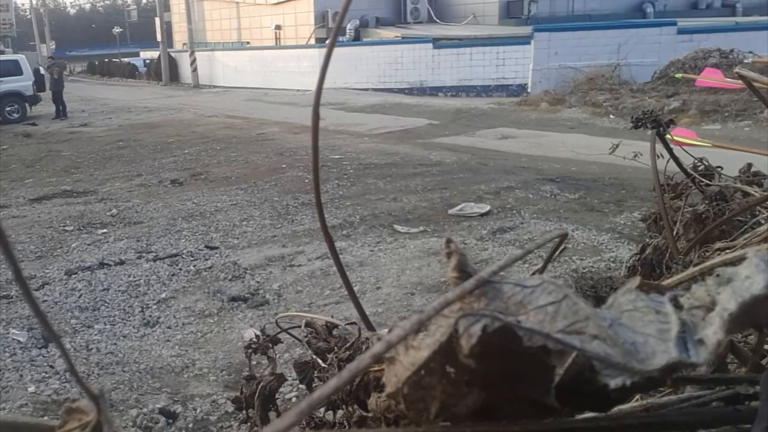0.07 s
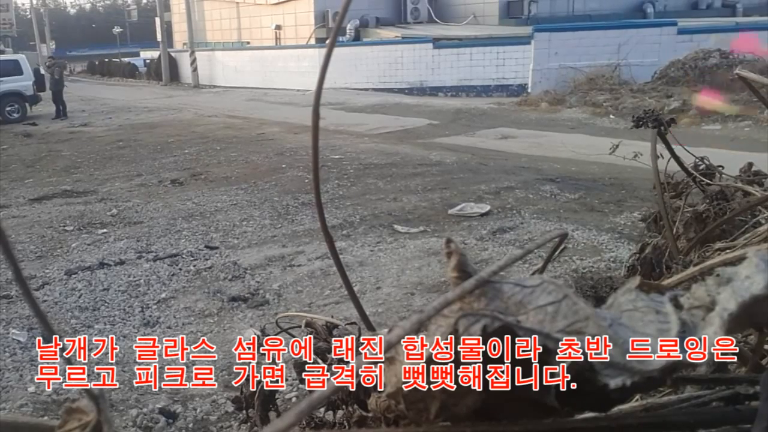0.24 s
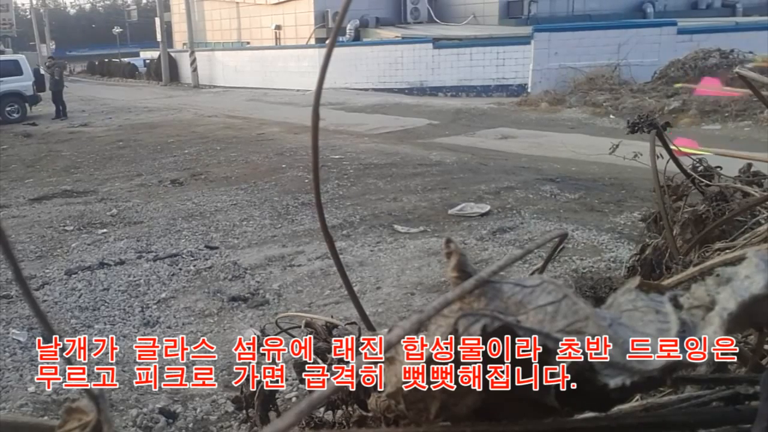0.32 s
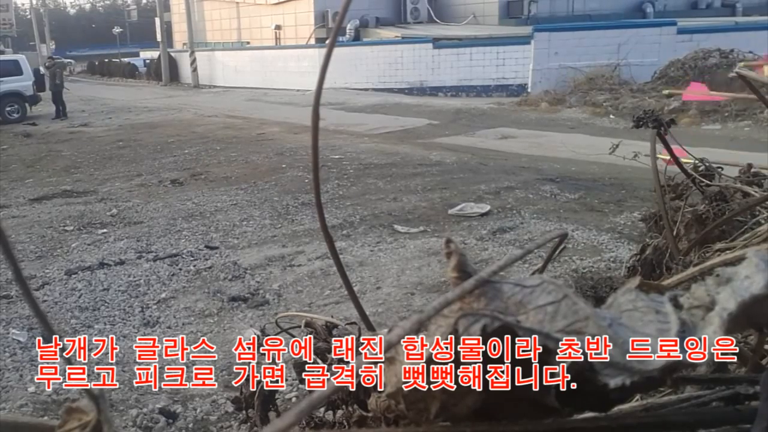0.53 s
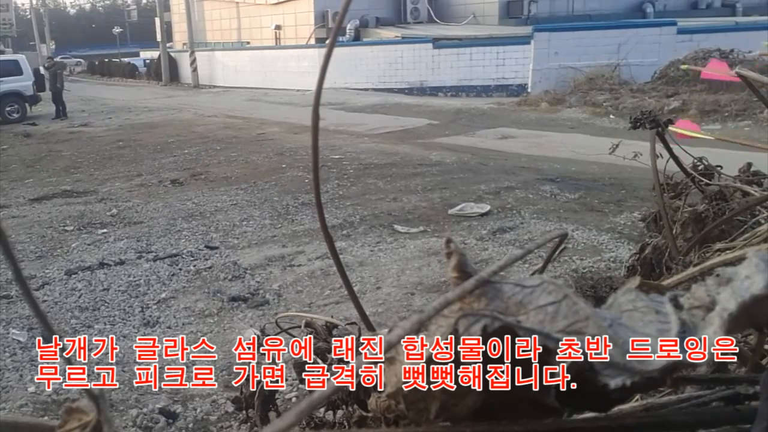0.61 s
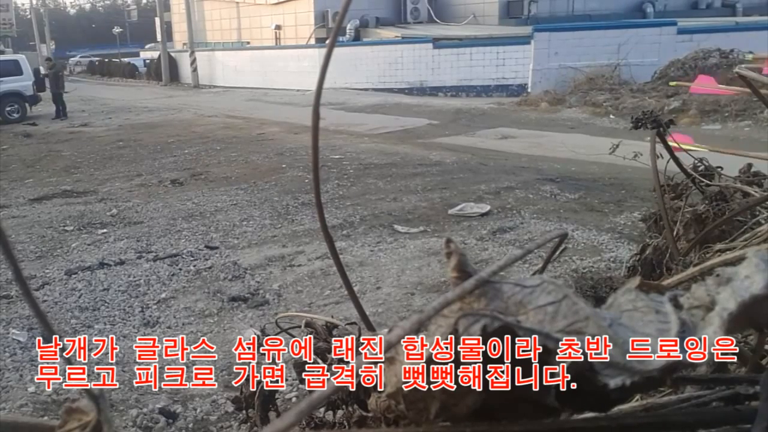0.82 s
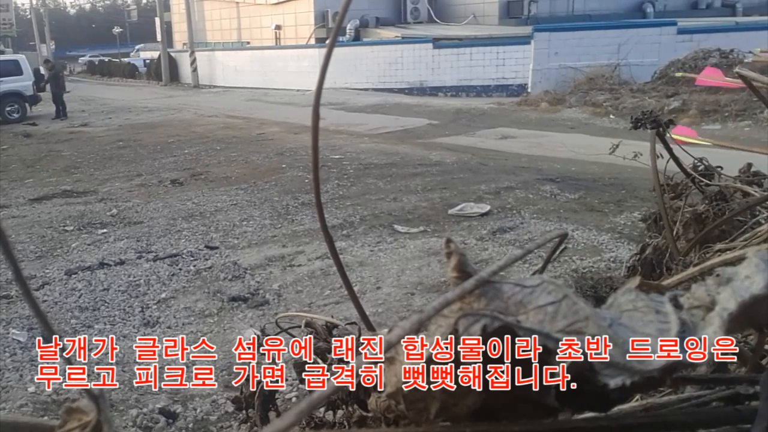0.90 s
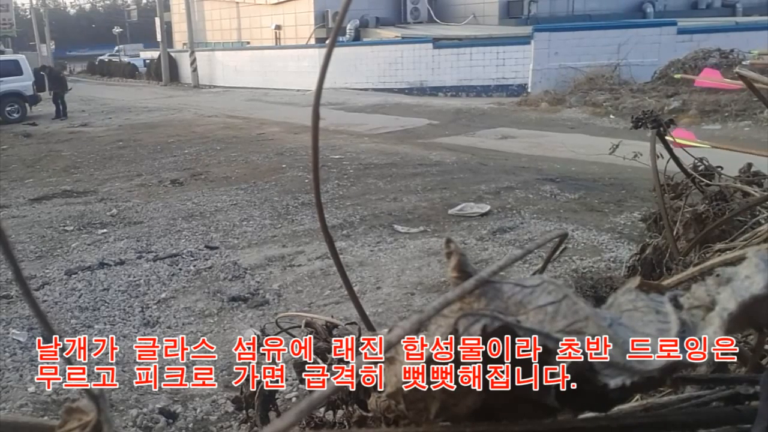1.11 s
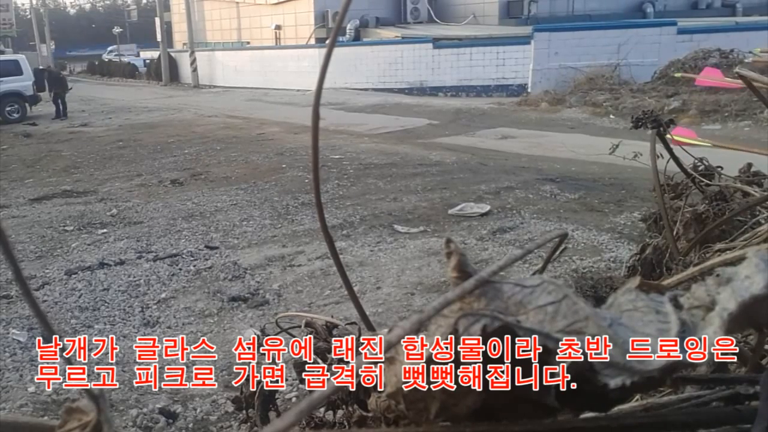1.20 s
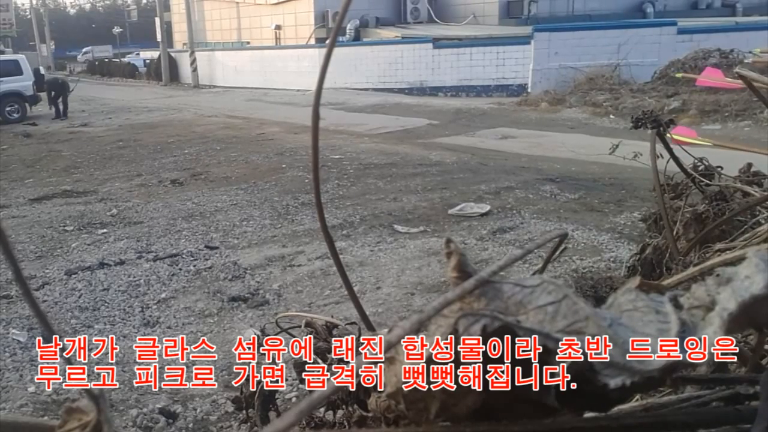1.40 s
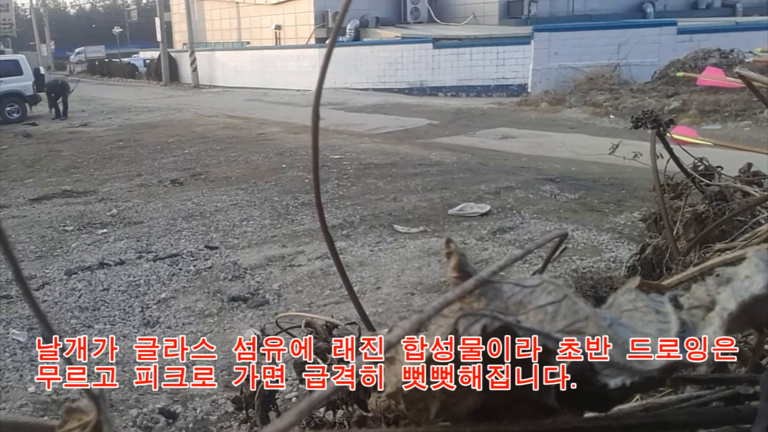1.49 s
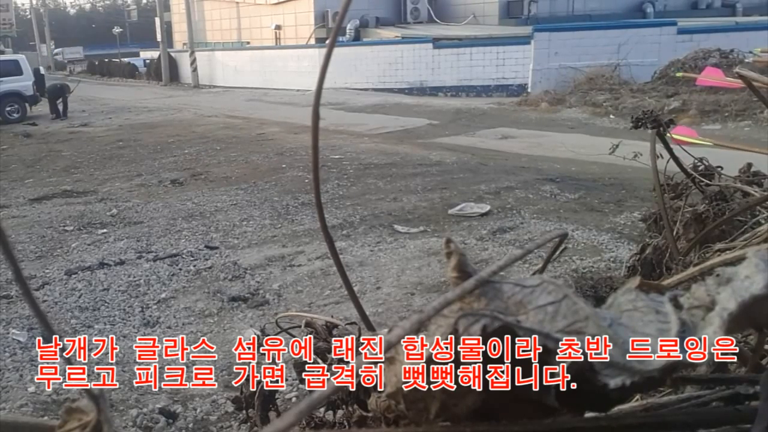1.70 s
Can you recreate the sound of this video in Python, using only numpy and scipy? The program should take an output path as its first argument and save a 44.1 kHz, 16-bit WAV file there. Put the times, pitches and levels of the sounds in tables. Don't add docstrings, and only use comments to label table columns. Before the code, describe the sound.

Arrow impact in an open yard: a loud double snap, woody thump, then debris settling over distant traffic.

```python
import sys
import numpy as np
from scipy import signal
from scipy.fft import rfft, irfft
from scipy.io import wavfile
from scipy.ndimage import uniform_filter1d

SR = 44100
rng = np.random.default_rng(int(sys.argv[2]) if len(sys.argv) > 2 else 0)


def int16_out(signal):
    q = np.round(np.clip(np.atleast_2d(signal).T, -1, 1) * 32767)
    wavfile.write(sys.argv[1], SR, q.astype(np.int16))


def elevation(decibels):
    levels = np.asarray(decibels, float)
    return 10 ** (levels / 20)


N = 77175
T = np.arange(N) / SR
STRIKE_S = .21347


def curve(table):
    return np.interp(T, *np.array(table).T)


def shape(x, gain):
    return irfft(rfft(x) * gain(np.arange(N // 2 + 1) * SR / N + 1e-3), N)


def colour(x, table):
    hz, db = np.array(table).T
    y = shape(x, lambda f: elevation(np.interp(np.log(f), np.log(hz), db)))
    return y / np.sqrt(np.mean(y ** 2))


def band(x, hz, width_hz):
    b, a = signal.iirpeak(min(hz, .45 * SR), hz / width_hz, fs=SR)
    return signal.lfilter(b, a, x)


def place(x, pan_db, lead_s):
    left = x * elevation(pan_db / 2)
    right = shape(x, lambda f: np.exp(-2j * np.pi * f * lead_s)) * elevation(-pan_db / 2)
    return np.array([left, right])


def bump(start_s, length_s):
    u = np.clip((T - start_s) / (length_s / 2), 0, 40)
    return (u * np.exp(1 - u)) ** 2


def walk(rate_hz):
    k = int(SR / rate_hz)
    steps = np.repeat(rng.standard_normal(N // k + 1), k)[:N]
    wander = uniform_filter1d(steps, k)
    return wander / wander.std()


# time_s, level_db
TRAFFIC_SWELL = [
    (0, -44.5),
    (.19, -45),
    (.45, -51),
    (.62, -48.5),
    (.86, -53),
    (1.0, -50.5),
    (1.2, -46),
    (1.45, -43.5),
    (1.75, -41),
]
# freq_hz, level_db (per Hz)
TRAFFIC_SPECTRUM = [(15, -54), (25, -17.5), (104, -3), (206, -7.5), (592, -17.5), (936, -14), (1150, -20),
                    (1620, -19), (6000, -45.5), (7800, -72), (13200, -120)]


def traffic():
    shared_below_hz, treble_follows = 810, .85
    common, left, right = (colour(g, TRAFFIC_SPECTRUM) for g in rng.standard_normal((3, N)))
    share = lambda f: 1 / (1 + (f / shared_below_hz) ** 2)
    own = np.array([shape(g, lambda f: np.sqrt(1 - share(f))) for g in (left, right)])
    both = place(shape(common, lambda f: np.sqrt(share(f))), 1.4, -.00015) + own
    level = curve(TRAFFIC_SWELL)
    out = 0
    for k in range(10):
        octave = shape(both, lambda f: np.cos(np.pi / 2 * np.clip(np.log2(f / 30) - k, -1, 1)) ** 2)
        follow = 1 if k < 7 else treble_follows
        level_db = level.max() + follow * (level - level.max())
        out = out + octave * elevation(level_db + 1.3 * walk(14))
    return out


# freq_hz, level_db (per Hz)
HISS_SPECTRUM = [(2500, -46), (5000, 2.5), (8000, -5), (11000, -5.5), (13000, -2), (14700, -5.5)]


def camera():
    hiss = np.array([colour(g, HISS_SPECTRUM) for g in rng.standard_normal((2, N))]) * elevation(-62.5)
    level = curve(TRAFFIC_SWELL)
    hiss = hiss * elevation(.5 * (level - level.max()))
    whine_hz, whine_db, wander_db = 7750, -80, 3
    whine = band(rng.standard_normal(N), whine_hz, 120)
    return hiss + elevation(whine_db + wander_db * walk(5.3)) * whine / whine.std()


def thud():
    hz, width_hz, level_db, t60_s = 463, 700, -39, .76
    middle, side = (band(band(g, hz, width_hz), hz, width_hz) for g in rng.standard_normal((2, N)))
    rumble = middle + .5 * side * np.array([[1], [-1]])
    decay = elevation(level_db - 60 * (T - STRIKE_S) / t60_s) * (T > STRIKE_S)
    return rumble / rumble.std() * decay


# time_s, level_db
TRICKLE_LEVEL = [
    (.2135, -37),
    (.242, -35.5),
    (.29, -43),
    (.335, -42),
    (.445, -49),
    (.51, -61),
    (.60, -48),
    (.66, -54),
    (.80, -66),
]
# freq_hz, level_db (per Hz)
TRICKLE_SPECTRUM = [(600, -41), (1200, -3), (2400, -5), (3300, -5), (4500, -4), (6200, -0.5), (9000, -9),
                    (12000, -11.5), (14500, -7)]


def trickle():
    grains_per_s, spread_db, biggest = 7000, 3, 3
    hit = rng.random((3, N)) < grains_per_s / SR
    sign = np.sign(rng.standard_normal((3, N)))
    size_db = spread_db * np.minimum(rng.exponential(size=(3, N)), biggest)
    common, left, right = (colour(g, TRICKLE_SPECTRUM) for g in hit * sign * elevation(size_db))
    share = .35
    both = np.sqrt(share) * place(common, 2.5, .000338) + np.sqrt(1 - share) * np.array([left, right])
    dying_db = 260 * np.maximum(T - TRICKLE_LEVEL[-1][0], 0)
    fall = elevation(curve(TRICKLE_LEVEL) - dying_db) * (T > STRIKE_S)
    last_slide = elevation(-63) * bump(.882, .093)
    return both * elevation(.4 * walk(60)) * (fall + last_slide)


# burst_peak_s, peak_db, pitch_hz, width_hz
YARD_ECHOES = [(.332, -30, 4500, 7000), (.334, -39, 1250, 500), (.355, -41, 1900, 1200),
               (.3694, -34, 4500, 6000), (.382, -41, 3000, 4000), (.401, -38, 5800, 2500),
               (.418, -40, 5000, 4000), (.44, -40, 5500, 6000), (.547, -46, 6100, 2500),
               (.5905, -34, 6500, 9000), (.594, -42, 2500, 1200), (.629, -41, 6000, 3000),
               (.929, -55, 6500, 5000), (.9445, -44, 5640, 550), (.971, -55, 6000, 4000)]


def echoes():
    length_s = .0024
    out = 0
    for s, db, hz, width_hz in YARD_ECHOES:
        burst = rng.standard_normal(N) * bump(s - length_s / 2, length_s)
        tick = band(band(burst, hz, width_hz), hz, width_hz)
        out = out + elevation(db) * tick / np.abs(tick).max()
    return place(out, 6, .000294)


def flight():
    hz, width_hz, strike_db, rise_db_per_s = 6300, 6000, -43, 220
    hiss = band(band(rng.standard_normal(N), hz, width_hz), hz, width_hz)
    approach = elevation(strike_db + rise_db_per_s * (T - STRIKE_S)) * (T < STRIKE_S)
    return place(hiss * approach, 1.5, .00019)


# pitch_hz, t60_s, strike_swing, rebound_swing (linear; sign: side that moves first)
BOARD_MODES = [(146, .45, -.03, -.025), (200, .105, .2, .11), (258, .071, .25, -.1), (294, .05, -.28, .04),
               (380, .131, -.16, .28), (398, .075, .2, -.016), (525, .028, -.08, .06),
               (622, .026, -.5, .05), (715, .043, -.45, -.035), (748, .083, -.126, .11),
               (1130, .011, -.66, .06), (1850, .008, -.16, 0), (2450, .012, -.16, 0), (3350, .012, .1, 0)]


def board():
    rebound_s, echo_s, echo_db = .23198, .331, -22
    rise_cycles, rebound_rise_cycles = .95, .35
    out = 0
    for hz, t60, strike, rebound in BOARD_MODES:
        blows = ((STRIKE_S, strike, rise_cycles),
                 (rebound_s, rebound, rebound_rise_cycles),
                 (echo_s, rebound * elevation(echo_db), rise_cycles))
        for s, swing, rise in blows:
            u = np.maximum(T - s, 0)
            envelope = elevation(-60 * u / t60) * (1 - np.exp(-u * hz / rise))
            out = out + swing * envelope * np.sin(2 * np.pi * hz * u)
    out = signal.sosfilt(signal.butter(2, 125, "high", fs=SR, output="sos"), out)
    return place(out * elevation(-.2), 2.7, .0003)


# start_s, level_db, pitch_hz, length_s, pan_db (left over right)
TIP_SNAPS = [
    (.2132, -8, 6300, .0011, 7),
    (.2136, -15, 3600, .0012, 1),
    (.2155, -13, 5400, .0009, 4),
    (.2221, -7.5, 3950, .0011, 0),
    (.2220, -10, 9800, .001, -3),
    (.2221, -15, 5600, .0009, -1),
    (.2222, -16, 12500, .001, -6),
    (.2236, -18, 4700, .001, 2),
]


def snaps():
    q, grit_db = 1.8, -8
    out = 0
    for s, db, hz, length, pan_db in TIP_SNAPS:
        grit = band(rng.standard_normal(N), hz, 2 * hz / q)
        squeak = np.sin(2 * np.pi * hz * (T - s))
        snap = bump(s, length) * (squeak + elevation(grit_db) * grit / grit.std())
        out = out + place(elevation(db) * snap / np.abs(snap).max(), pan_db, .0003)
    return out


def scene():
    background = traffic() + camera()
    heap = thud() + trickle() + echoes()
    return background + heap + flight() + board() + snaps()


def roll_off(x):
    return signal.sosfilt(signal.butter(12, 15500, fs=SR, output="sos"), x)


# pitch_hz, width_hz, gain_db
PORT_PEAKS = [
    (5520, 4300, 7.5),
    (8070, 1200, 8.5),
]


def record(dry):
    ports = np.array([x + (elevation(db) - 1) * band(x, hz, width_hz)
                      for x, (hz, width_hz, db) in zip(dry, PORT_PEAKS)])
    low_cut_hz, top_hz, limit = 40, 14450, 1.3
    ports = signal.sosfilt(signal.butter(2, low_cut_hz, "high", fs=SR, output="sos"), ports)
    ports = limit * np.tanh(ports / limit)
    mix = signal.sosfilt(signal.ellip(8, .3, 45, top_hz, fs=SR, output="sos"), ports)
    return roll_off(mix)


dry = scene()
out = record(dry)
int16_out(out)
```